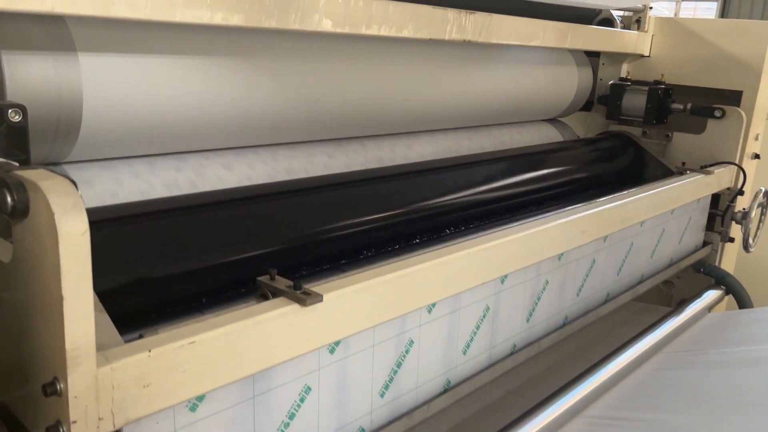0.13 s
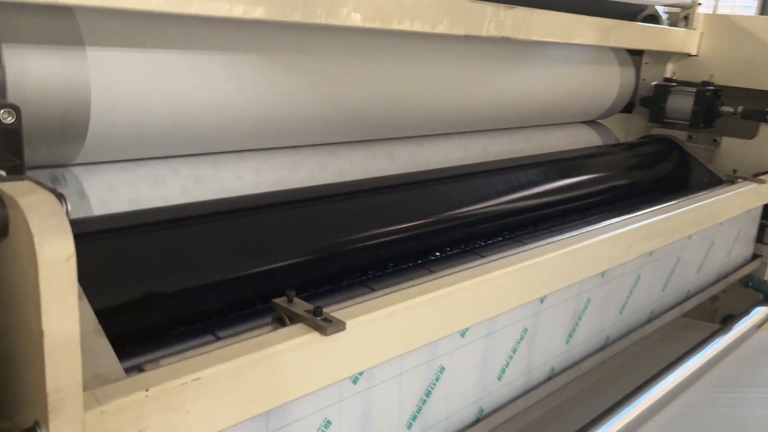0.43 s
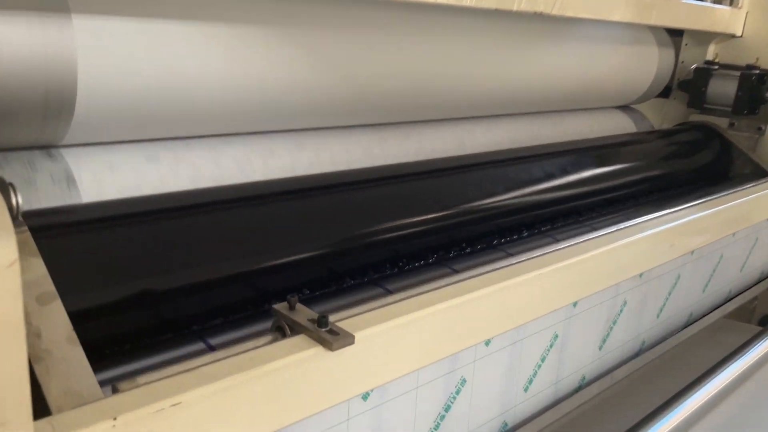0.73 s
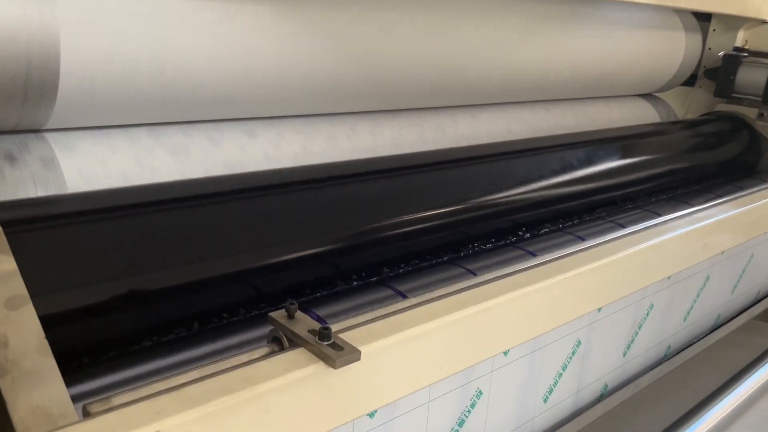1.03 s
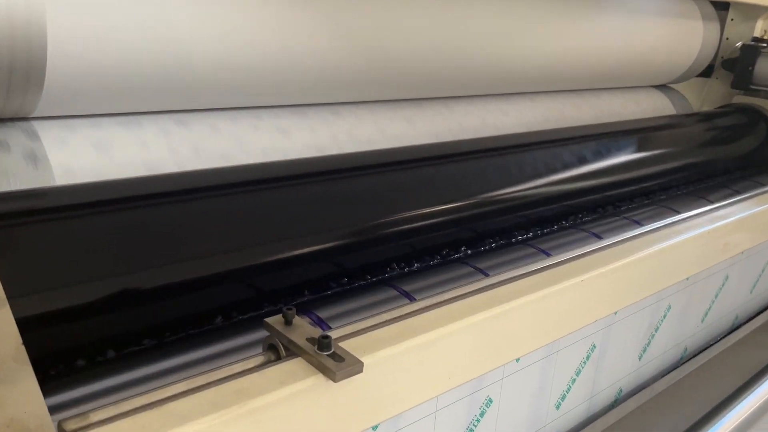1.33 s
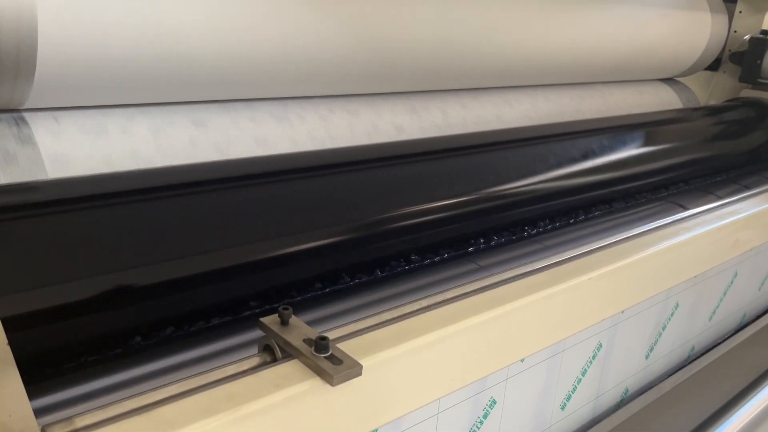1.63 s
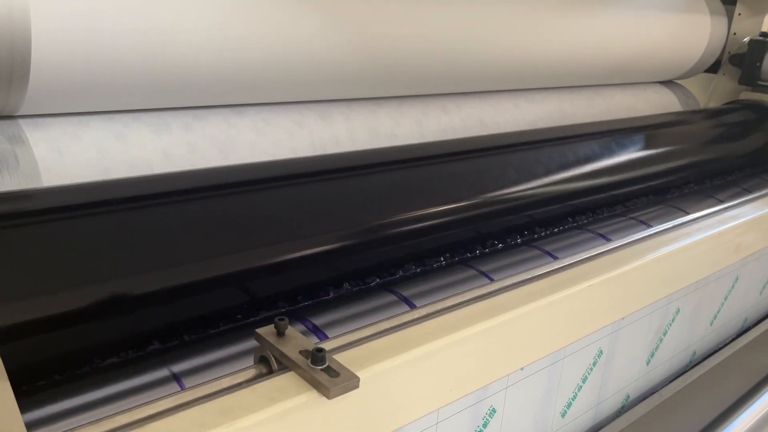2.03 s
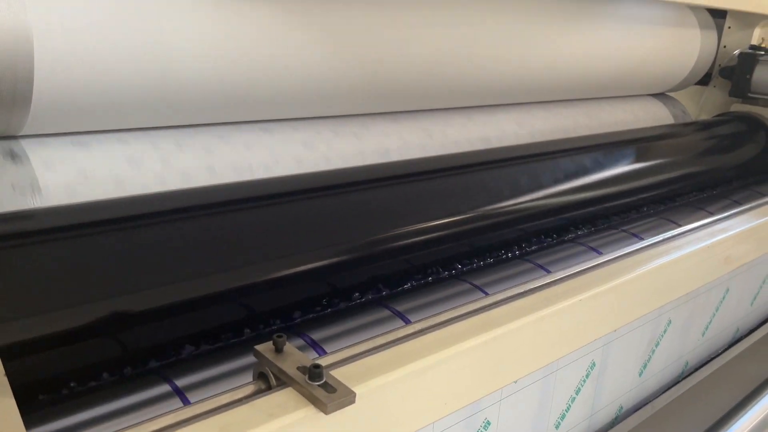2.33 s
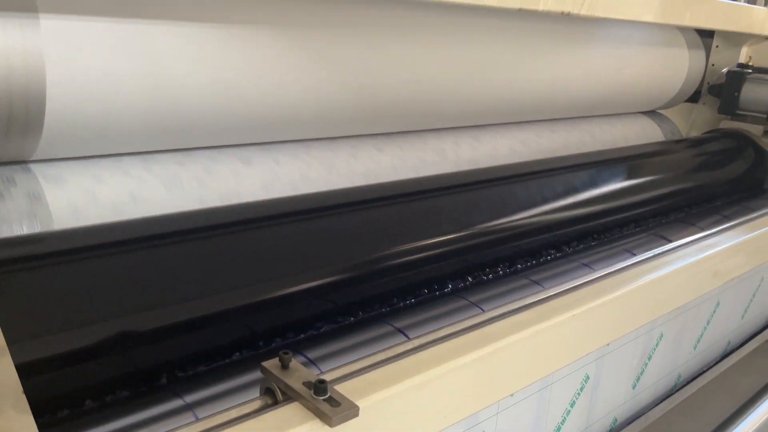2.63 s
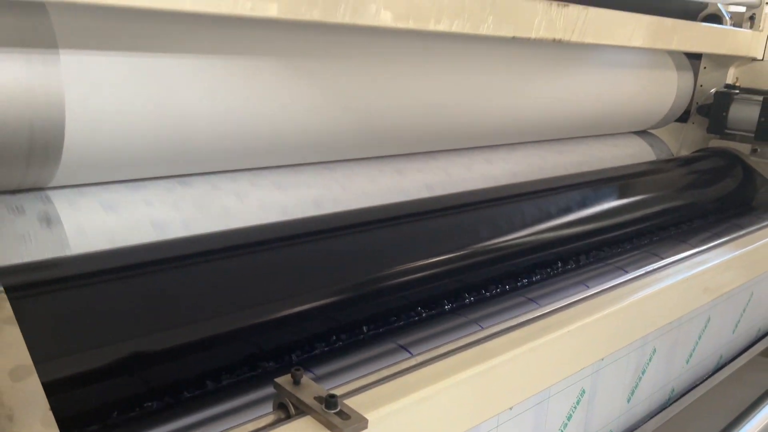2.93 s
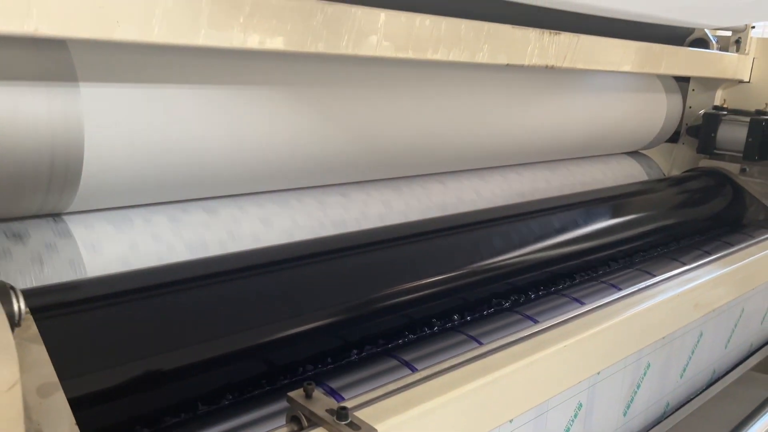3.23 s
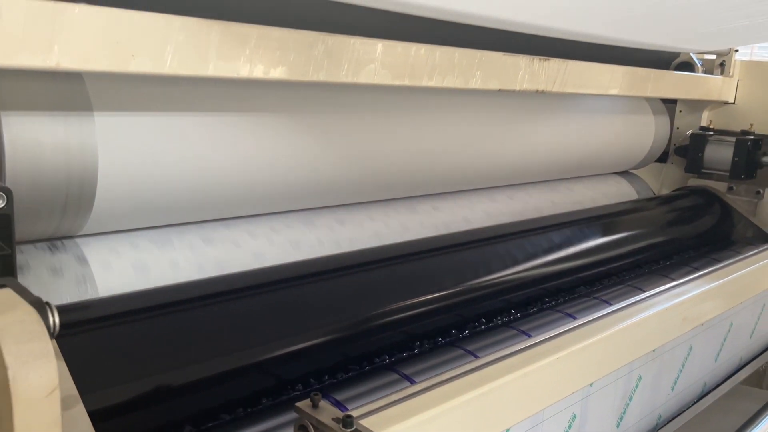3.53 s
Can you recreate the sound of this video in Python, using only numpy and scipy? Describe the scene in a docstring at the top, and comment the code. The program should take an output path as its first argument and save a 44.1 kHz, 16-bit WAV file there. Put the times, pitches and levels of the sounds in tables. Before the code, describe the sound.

Industrial rollers drone and rumble without pause, rapid muffled knocks repeating with each shaft turn while the moving web hisses and ticks softly; speed rises slightly, picked up by a handheld microphone near the machine.

```python
"""Dull knocks repeat every turn of a shaft over a roar: a paper converting machine in a factory hall, gaining speed.
Blows ring the steel frame's modes with a very short thump; unbalance adds sines at shaft and roller orders; the roar
of rollers and motors is resonant noise; the rushing web hisses, its treble flickering, and ticks in bright bursts.
Two hand-held microphone ports hear it with different phase and shading by frequency."""
import sys
import numpy as np
from scipy import signal
from scipy.fft import rfft, irfft
from scipy.io import wavfile
from scipy.ndimage import uniform_filter1d

SR = 44100
rng = np.random.default_rng(int(sys.argv[2]) if len(sys.argv) > 2 else 0)


def wav_record(signal):
    """Record a signal, one row per channel, as 16-bit PCM in the file named by sys.argv[1]."""
    frames = np.transpose(np.atleast_2d(signal))
    bounded = np.clip(frames, -1, 1)
    # unit amplitude maps onto the largest positive 16-bit level
    quanta = np.round(bounded * 32767).astype(np.int16)
    wavfile.write(sys.argv[1], SR, quanta)


N = 161847

# shaft speed: time_s, speed_turns_per_s
SHAFT_SPEED = [(0, 7.77), (.3, 7.83), (.6, 7.922), (.9, 7.943), (1.3, 8.033), (1.85, 8.153), (2.7, 8.162),
               (3.0, 8.119), (3.3, 8.154), (3.67, 8.143)]
# relative levels over time, knocks, roar, treble and whirr shifting as the hand-held ports drift, the passing
# tones swelling and fading: time_s, knocks_db, roar_db, passing_tones_db, treble_db, whirr_db
DRIFT_LEVELS = [(0, -2.5, 2, 0, 0, 0), (.4, -1, 1.5, 1, 1.5, 0.5), (.8, 1, 2, -2.5, 2, 1),
                (1.2, -1.5, 2.5, -13, 0, 1.5), (1.5, 0, 2.5, -1, 1.5, 1), (1.9, 1, 0, -11, -0.5, 0.5),
                (2.4, -0.5, 1, -6.5, 1, -.5), (2.8, 0, -1.5, -11, 1, -0.5),
                (3.2, -1.5, -2.5, -12.5, -2, -1.5), (3.67, -3, -2.5, -8.5, -2.5, -3)]
KNOCKS_COL, ROAR_COL, PASSING_COL, TREBLE_COL, WHIRR_COL = 1, 2, 3, 4, 5
# spectrum shape of roar and hiss: freq_hz, relative_density_db
ROAR_SPECTRUM = [(20, -56), (38, -60), (55, -54), (66, -38), (100, -50.5), (150, -36.5), (230, -34),
                 (400, -35.5), (520, -39.5), (600, -41), (800, -45), (1080, -50.5), (1600, -50.5),
                 (1950, -54.5), (2800, -53.5), (3500, -56.5), (5000, -61), (6500, -64.5), (8000, -69.5),
                 (9300, -59.5), (11000, -66.5), (13000, -69.5), (15800, -78)]
# roller and panel resonances excited by the roar: freq_hz, width_hz, rise_db
ROLLER_RESONANCES = [(198.6, 11, 6), (269, 46, 4), (347, 53, 3.5), (388.4, 11, 7.5), (501, 27, 5),
                     (678, 20, 4.5), (911, 88, 8.5), (1220, 28, 13.5), (1260, 64, 9.5), (1360, 140, 7.5),
                     (2098, 53, 6.5), (2520, 110, 1.5)]
# larger ticks of the web: time_s, relative_level_db
WEB_TICKS = [(0.2932, -38), (0.6115, -28), (0.7532, -30), (1.0311, -29), (1.2256, -30), (1.488, -27),
             (1.8372, -27), (1.888, -25.5), (1.937, -32), (2.0818, -29), (2.3276, -33), (2.4713, -29),
             (2.593, -29), (2.6514, -29), (2.7087, -27), (2.9392, -31), (3.3338, -33)]
# shaft orders that crest together once a turn: multiple, nominal_rms_db
THROB_ORDERS = [(8, -34.5), (9, -35.5), (24, -36.5)]
# shaft orders with free phases: multiple, nominal_rms_db
FREE_SHAFT_ORDERS = [(11, -33.5), (13, -39.5), (15, -57), (17, -39), (64, -35)]
# shaft orders that come and go with the passing-tones level: multiple, nominal_rms_db
PASSING_ORDERS = [(49, -27), (63, -26)]
# orders of the slower roller: multiple of its own speed, nominal_rms_db
SLOW_ROLLER_ORDERS = [(73, -30), (74, -35), (127, -33), (147, -35)]
# blows of one turn: place_turns, relative_level_db, direction (+1 or -1)
TURN_KNOCKS = [(0.002, -9.5, 1), (0.101, -4.6, -1), (0.17, -5.1, 1), (0.294, -12.4, 1), (0.438, -1.3, 1),
               (0.497, -8.7, 1), (0.557, -16.6, -1), (0.668, -3.9, -1), (0.817, -1.0, -1),
               (0.884, -11.3, -1), (0.898, 0.0, -1), (0.909, -4.1, -1)]
# frame modes, plus one very short broadband thump (last row): freq_hz, relative_level_db, t60_s
FRAME_MODES_AND_THUMP = [(154.4, -25.3, .5), (224.7, -17, .326), (285.3, -19.8, .117), (337.6, -15.2, .106),
                         (379.8, -17.5, .07), (467, -24, .4), (543, 9, .001)]
# left-right likeness of the noise by band, as encoded in the stereo sound: freq_hz, likeness (clipped to 0-1)
NOISE_LIKENESS = [(60, 0.93), (200, 0.64), (400, 0.77), (800, .5), (1100, -0.15), (1600, .5), (2400, 0.6),
                  (2900, 0.2), (4500, 1.5), (5300, -0.17), (6500, -1.3), (7400, -0.06), (7800, 2),
                  (8800, 8), (10300, -8.5), (11100, 19), (13000, -0.5), (13800, 2), (14500, 3)]
# phase between the ports: freq_hz, left_lead_rad (negative: right leads)
PORT_LEAD = [(0, 0), (150, .15), (430, .45), (700, 1.3), (1000, 2.6), (1300, 3.6), (1600, 3.4), (1810, .6),
             (2100, -.4), (2900, 1.1), (4400, .8), (5000, .5), (5500, -1), (6500, -1.1), (7400, -2.4),
             (7750, -3.14), (8900, -3.2), (11050, -6.28), (13100, -6.3), (13700, -6.7), (14000, -9.1),
             (14500, -9.42)]
# shading between the ports: freq_hz, left_over_right_db
PORT_BALANCE = [(30, 0), (60, 1.4), (130, 1.3), (200, 1.6), (400, 0), (600, 2.2), (850, 8), (1150, 4),
                (1550, -.5), (1900, 6), (2400, 3), (3500, 8), (4800, 9), (6000, 3), (7700, 0), (15000, 0)]

TURN_START_S = 2.091  # a turn begins here
TURNS_PER_ROLLER_TURN = 3
ROLLER_CREST_ROLLER_TURNS = .38  # where hiss and blows swell
ROAR_RMS_DB, PATCH_RMS_DB = -18, 1.5
WHIRR_EDGE_HZ, TREBLE_EDGE_HZ = 1070, 5650  # lower edges
FLICKER_RMS_DB, WEB_SWELL_DB = 1.38, .45
TICK_BAND_HZ, TICK_T60_S, TICK_RISE_S = (7500, 12500), .035, .0026
SMALL_TICKS_PER_S, SMALL_TICK_FLOOR_DB, SMALL_TICK_MEAN_EXCESS_DB = 150, -52, 1.1
WAVER_RMS_TURNS = .003
THROB_CREST_TURNS, ROLLER_HUM_CREST_ROLLER_TURNS = .58, .3
KNOCK_SPREAD_DB, KNOCK_SPREAD_S, KNOCK_SURGE_DB = 1.2, .0002, .5
BLOW_CUT_HZ = 650  # soft blows excite nothing higher
FRAME_LOW_CUT_HZ = 114  # the frame radiates no deep bass
MIC_LOW_CUT_HZ, MIC_TOP_HZ, CEILING = 73, 15800, .9


def amp(db):
    """Decibels to gain."""
    return 10 ** (np.asarray(db) / 20)


def read(points, hz):
    """Table value at a frequency, interpolated on a log axis."""
    table_hz, value = np.transpose(points)
    return np.interp(np.log(hz + 1), np.log(table_hz + 1), value)


def drift_level_db(column):
    """One column of the drift table, per sample."""
    table = np.transpose(DRIFT_LEVELS)
    return np.interp(np.arange(N) / SR, table[0], table[column])


def evened(x):
    """Scaled to rms 1."""
    return x / np.sqrt(np.mean(x ** 2))


def smooth_noise(first_size, second_size):
    """Slow random curve of rms 1: white noise through two moving averages."""
    once = uniform_filter1d(rng.standard_normal(N), size=first_size)
    return evened(uniform_filter1d(once, size=second_size))


def butter(order, hz, kind, x, run=signal.sosfilt):
    """Butterworth filtering."""
    return run(signal.butter(order, hz, kind, fs=SR, output="sos"), x)


def shaft_turns():
    """Shaft angle in turns: the running integral of speed."""
    turns = np.cumsum(np.interp(np.arange(N) / SR, *np.transpose(SHAFT_SPEED))) / SR
    return turns - turns[round(TURN_START_S * SR)]


def roller_swell(turns):
    """Cosine of the slower roller's angle, one crest per roller turn."""
    return np.cos(2 * np.pi * (turns / TURNS_PER_ROLLER_TURN - ROLLER_CREST_ROLLER_TURNS))


def roar(turns):
    """Two independent draws of resonant noise; the treble flickers and swells once per roller turn."""
    frames, hz = N // 512 + 5, np.fft.rfftfreq(2048, 1 / SR)[:, None]
    real_1, imag_1, real_2, imag_2, patches = rng.standard_normal((frames, 1025, 5)).T
    bins = np.array([real_1 + 1j * imag_1, real_2 + 1j * imag_2])

    # resonances add power
    rises = sum((amp(2 * db) - 1) / (1 + (2 * (hz - f) / width) ** 2) for f, width, db in ROLLER_RESONANCES)
    # patches smoothed over frequency, then time
    patches = uniform_filter1d(uniform_filter1d(patches, size=15, axis=0), size=5, axis=1)
    field_db = read(ROAR_SPECTRUM, hz) + PATCH_RMS_DB * evened(patches)
    bins = bins * np.sqrt(1 + rises) * amp(field_db)
    noise = signal.istft(bins, nperseg=2048, noverlap=1536)[1][:, :N]
    noise = amp(ROAR_RMS_DB) * evened(noise)

    hiss = butter(2, TREBLE_EDGE_HZ, "high", noise, signal.sosfiltfilt)
    whirr = butter(2, WHIRR_EDGE_HZ, "high", noise - hiss, signal.sosfiltfilt)
    body = noise - hiss - whirr
    flicker_db = FLICKER_RMS_DB * smooth_noise(1500, 800)
    hiss_db = drift_level_db(TREBLE_COL) + flicker_db + WEB_SWELL_DB * roller_swell(turns)
    return body * amp(drift_level_db(ROAR_COL)) + whirr * amp(drift_level_db(WHIRR_COL)) + hiss * amp(hiss_db)


def web_ticks():
    """Short decaying bursts of band-passed noise: larger ones listed, small ones at random."""
    small_db = SMALL_TICK_FLOOR_DB + rng.exponential(SMALL_TICK_MEAN_EXCESS_DB, N)
    snaps = amp(small_db) * (rng.random(N) < SMALL_TICKS_PER_S / SR)
    for time_s, db in WEB_TICKS:
        snaps[round(time_s * SR)] += amp(db)
    t = np.arange(2000) / SR
    burst = amp(-60 * t / TICK_T60_S) * np.minimum(t / TICK_RISE_S, 1) ** 2
    hiss = butter(4, TICK_BAND_HZ, "band", rng.standard_normal(N))
    return signal.oaconvolve(snaps, burst)[:N] * evened(hiss)


def tones(table, turns, phases_turns):
    """Sines at whole multiples of a turning speed."""
    return sum(amp(db) * np.sqrt(2) * np.cos(2 * np.pi * (round(order) * turns + phase))
               for (order, db), phase in zip(table, phases_turns))


def unbalance(turns):
    """Tones locked to the wavering angles of the shaft and the slower roller."""
    phases, aligned = rng.random(8), np.zeros(8)
    turns = turns + WAVER_RMS_TURNS * smooth_noise(6000, 4000)
    throb = tones(THROB_ORDERS, turns - THROB_CREST_TURNS, aligned)
    free = tones(FREE_SHAFT_ORDERS, turns, phases)
    roller_angle = turns / TURNS_PER_ROLLER_TURN - ROLLER_HUM_CREST_ROLLER_TURNS
    roller_hum = tones(SLOW_ROLLER_ORDERS, roller_angle, aligned)
    passing = tones(PASSING_ORDERS, turns, phases)
    steady = throb + free + roller_hum
    return steady * amp(drift_level_db(KNOCKS_COL)) + passing * amp(drift_level_db(PASSING_COL))


def knocks(turns):
    """Slightly uneven blows, the same each turn, excite ringing modes and a short thump; the slower roller surges them."""
    place, db, direction = np.transpose(TURN_KNOCKS)
    whole_turns = np.arange(-20, 16)[:, None]
    shape = len(whole_turns), len(place)
    # one second of lead-in, so earlier blows still ring at the start
    known_turns = np.r_[turns[0] - SHAFT_SPEED[0][1], turns]
    known_samples = np.r_[-SR, np.arange(N)]
    at = np.interp(whole_turns + place, known_turns, known_samples)
    at = at + SR * (1 + KNOCK_SPREAD_S * rng.standard_normal(shape))
    strength = direction * amp(db + KNOCK_SPREAD_DB * rng.standard_normal(shape))
    blows = np.bincount(np.clip(at, 0, N + 2 * SR).astype(int).ravel(), strength.ravel())
    blows = butter(4, BLOW_CUT_HZ, "low", blows, signal.sosfiltfilt)

    t = np.arange(SR // 2) / SR
    response = sum(amp(row_db - 60 * t / t60) * np.sin(2 * np.pi * hz * t)
                   for hz, row_db, t60 in FRAME_MODES_AND_THUMP)
    response = butter(4, FRAME_LOW_CUT_HZ, "high", response)
    surge_db = KNOCK_SURGE_DB * roller_swell(turns)
    return signal.fftconvolve(blows, response)[SR:SR + N] * amp(drift_level_db(KNOCKS_COL) + surge_db)


def scene():
    """Left hears the machine; right hears it phase-shifted and shaded by frequency, its noise partly independent."""
    turns = shaft_turns()
    near, independent = roar(turns)
    near = near + web_ticks()
    locked = unbalance(turns) + knocks(turns)
    ends = np.clip(np.minimum(np.arange(N), N - np.arange(N)) / (.004 * SR), 0, 1)  # 4 ms fades
    near, independent, locked = near * ends, independent * ends, locked * ends

    hz = np.fft.rfftfreq(N, 1 / SR)
    likeness = np.clip(read(NOISE_LIKENESS, hz), 0, 1)
    phase_shifted = np.exp(-1j * read(PORT_LEAD, hz)) * (likeness * rfft(near) + rfft(locked))
    right = phase_shifted + np.sqrt(1 - likeness ** 2) * rfft(independent)
    right = right / amp(read(PORT_BALANCE, hz))
    return np.array([near + locked, irfft(right, N)])


def record(dry):
    """Microphone drops the deep bass, the input stage rounds peaks above a knee, then a low-pass limits the band."""
    thin = butter(2, MIC_LOW_CUT_HZ, "high", dry)
    knee = CEILING * 2 / 3
    room = CEILING - knee
    rounded = np.sign(thin) * (knee + room * np.tanh((abs(thin) - knee) / room))
    thin = np.where(abs(thin) < knee, thin, rounded)
    low_pass = signal.firwin(511, MIC_TOP_HZ, window=("kaiser", 9), fs=SR)
    return signal.oaconvolve(thin, low_pass[None], "same")


dry = scene()
out = record(dry)
wav_record(out)
```